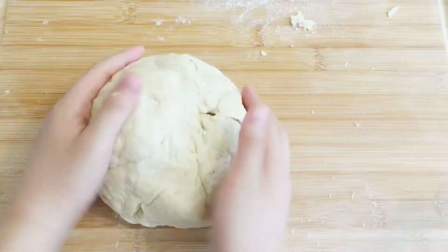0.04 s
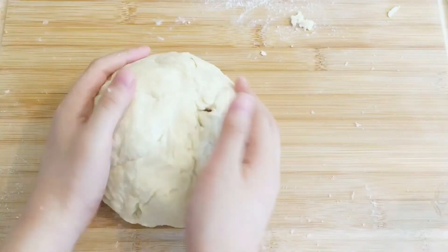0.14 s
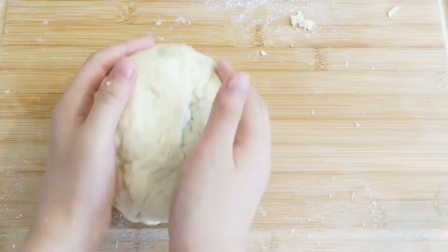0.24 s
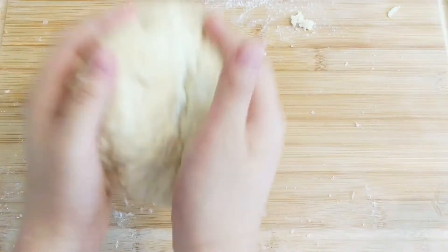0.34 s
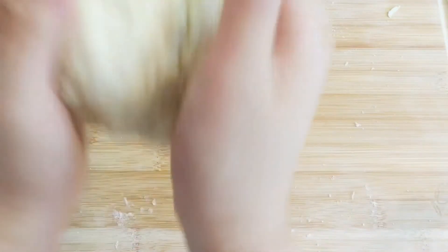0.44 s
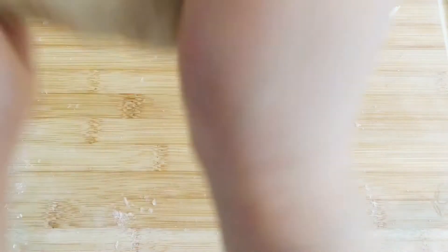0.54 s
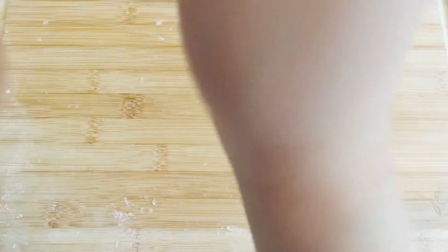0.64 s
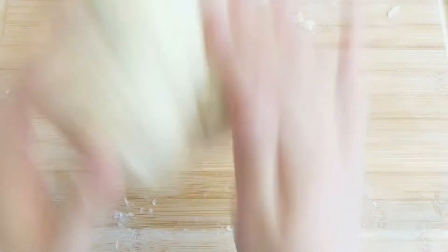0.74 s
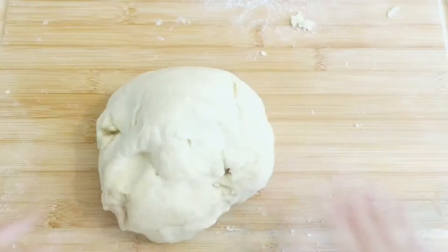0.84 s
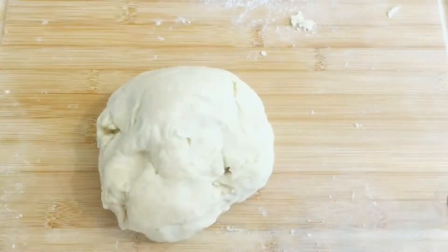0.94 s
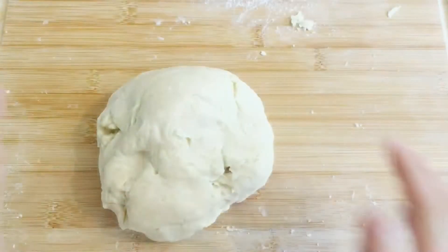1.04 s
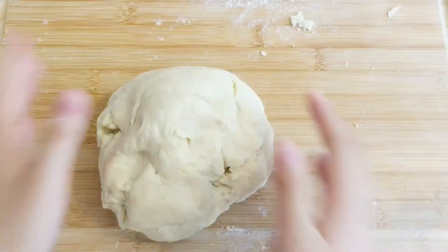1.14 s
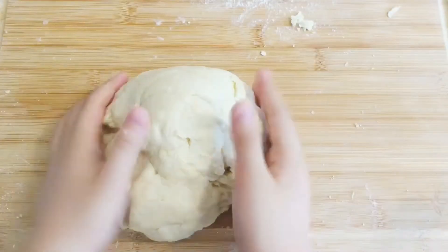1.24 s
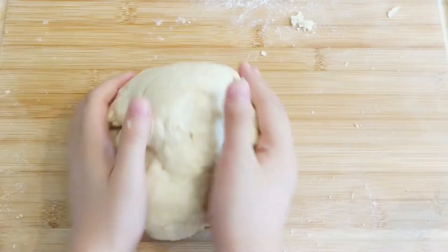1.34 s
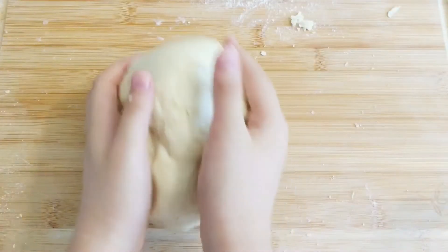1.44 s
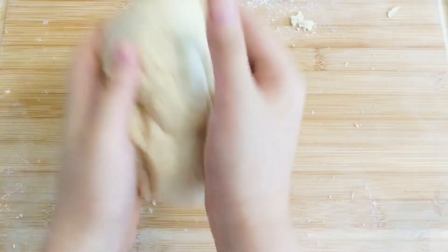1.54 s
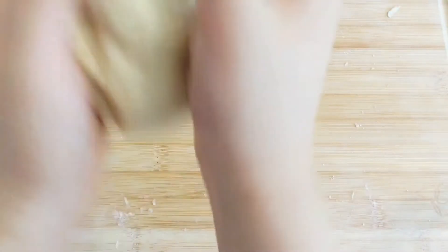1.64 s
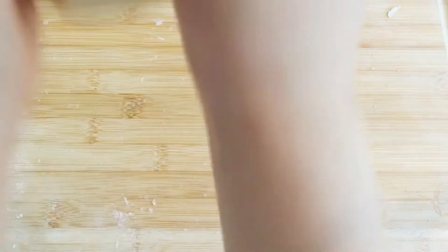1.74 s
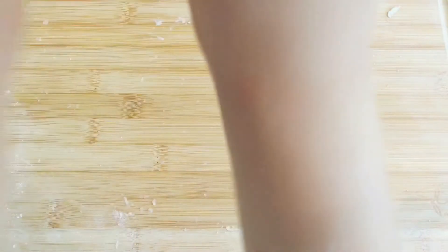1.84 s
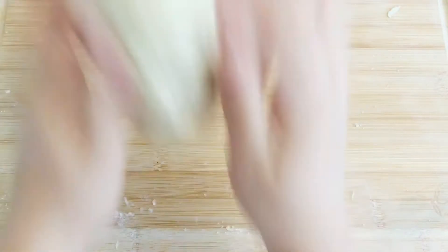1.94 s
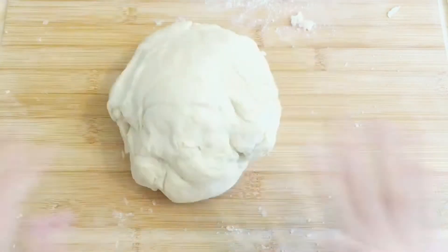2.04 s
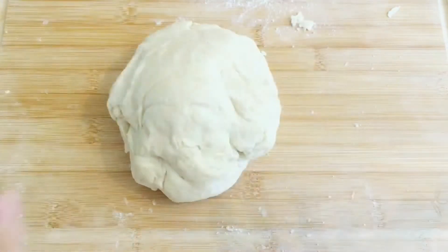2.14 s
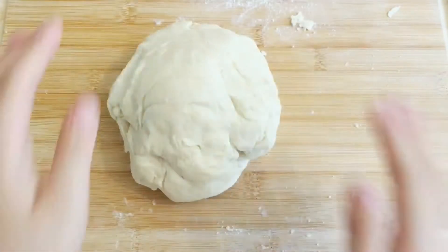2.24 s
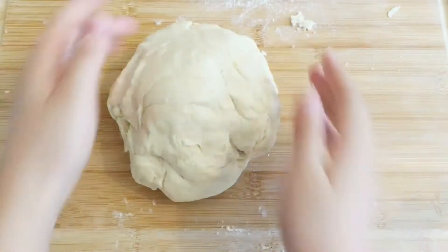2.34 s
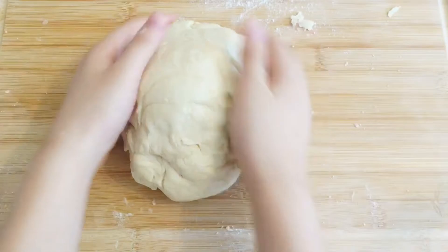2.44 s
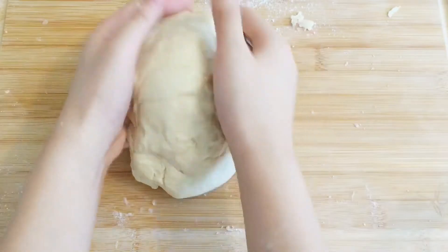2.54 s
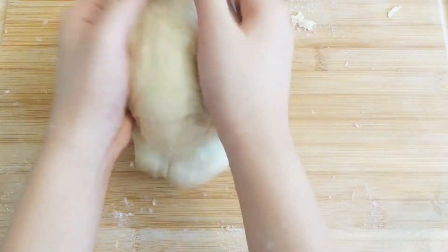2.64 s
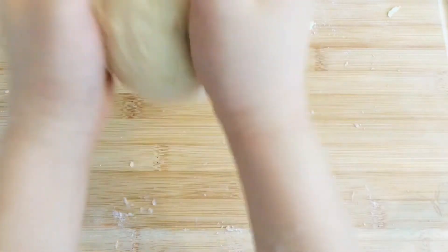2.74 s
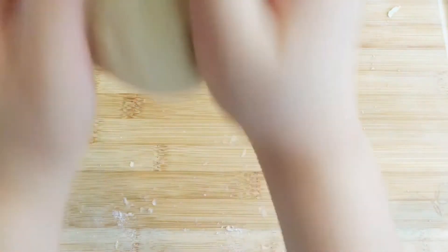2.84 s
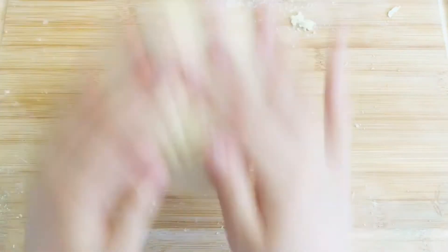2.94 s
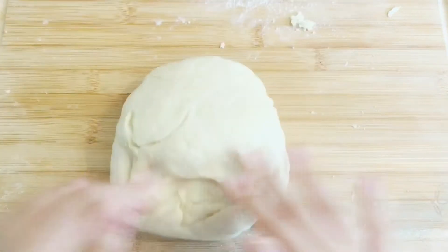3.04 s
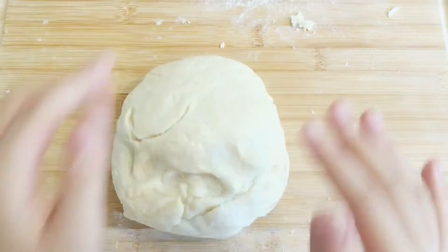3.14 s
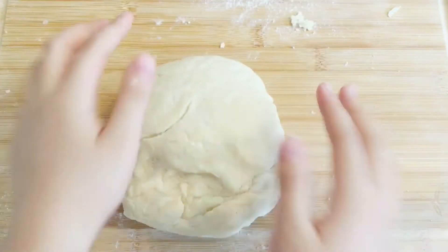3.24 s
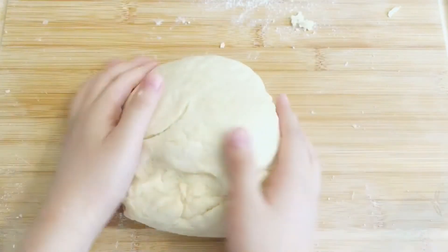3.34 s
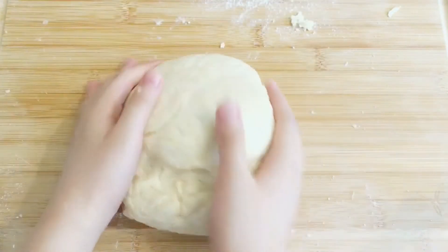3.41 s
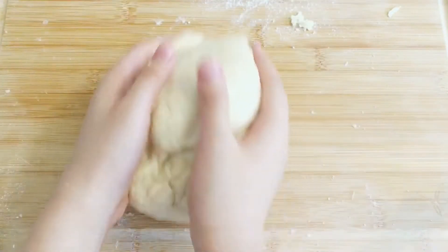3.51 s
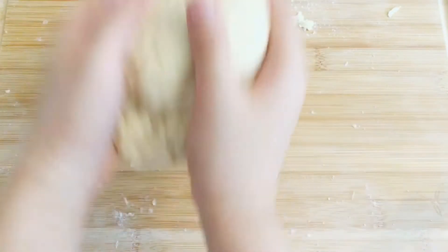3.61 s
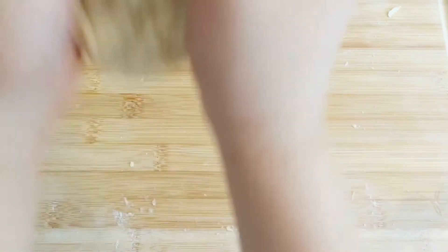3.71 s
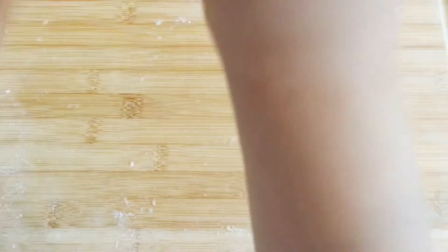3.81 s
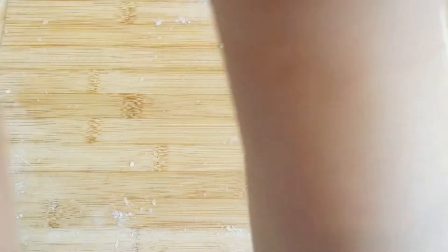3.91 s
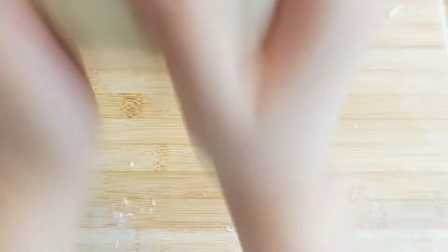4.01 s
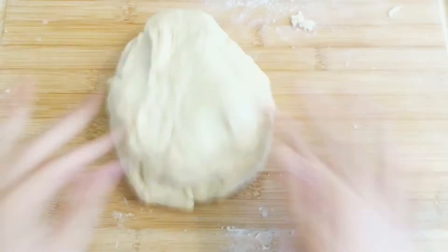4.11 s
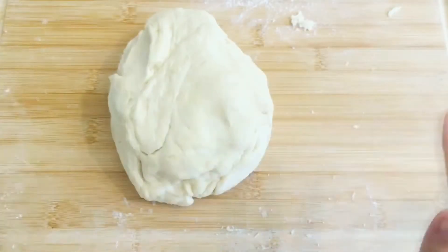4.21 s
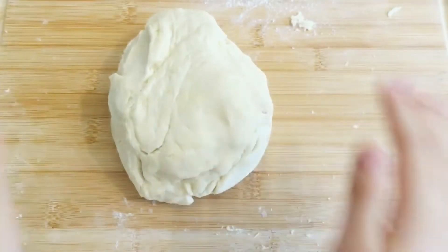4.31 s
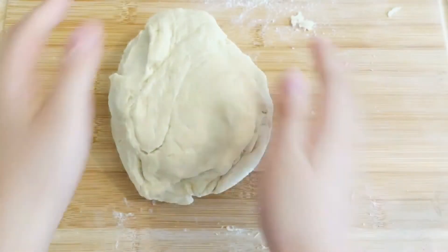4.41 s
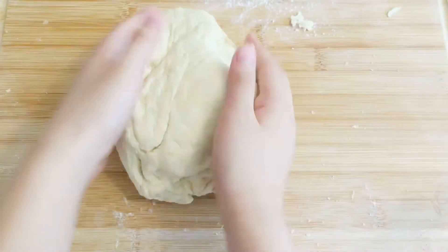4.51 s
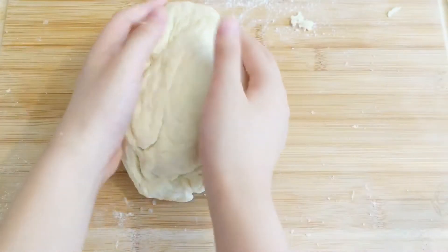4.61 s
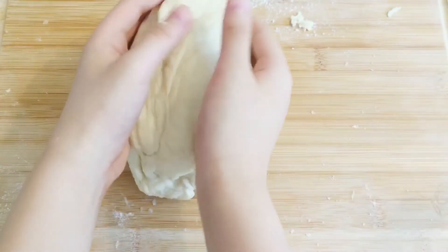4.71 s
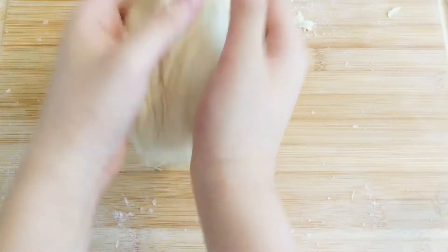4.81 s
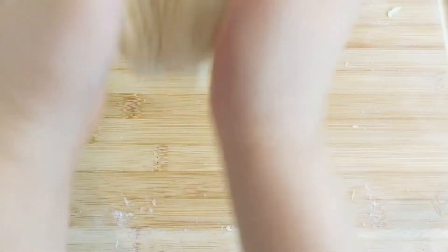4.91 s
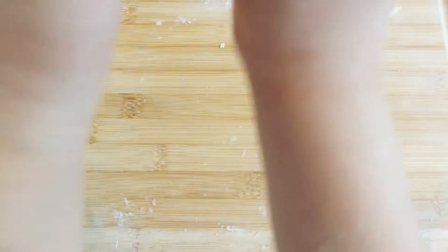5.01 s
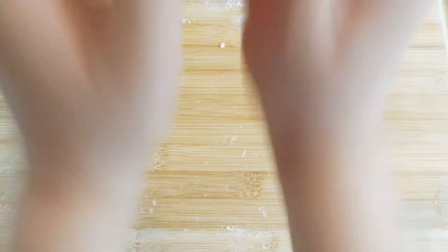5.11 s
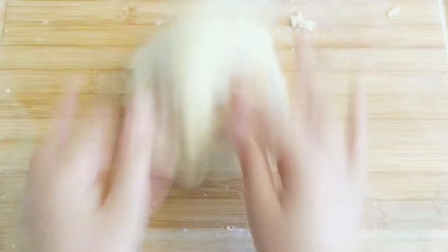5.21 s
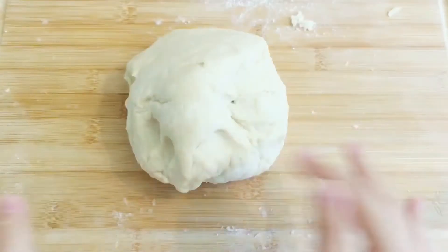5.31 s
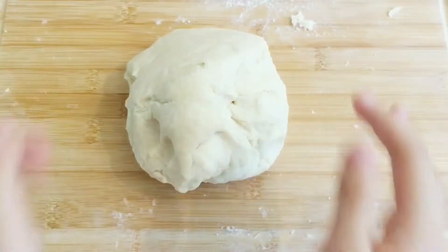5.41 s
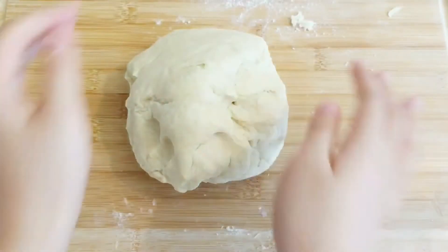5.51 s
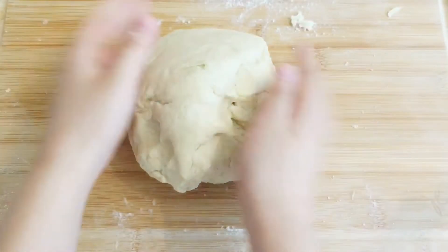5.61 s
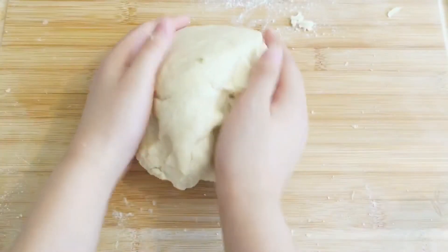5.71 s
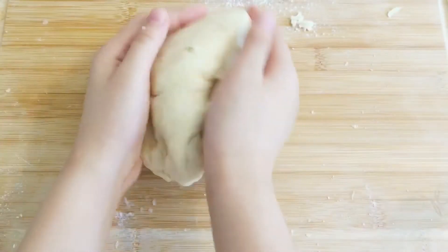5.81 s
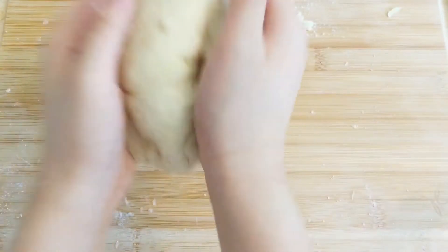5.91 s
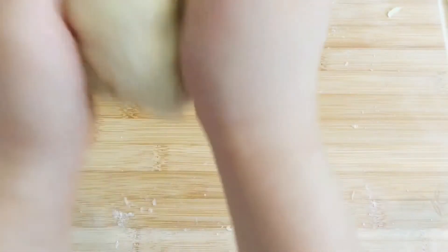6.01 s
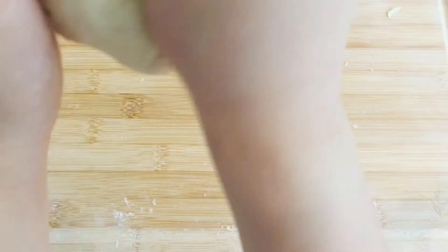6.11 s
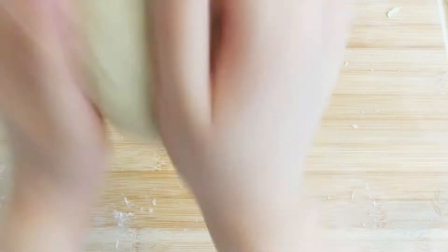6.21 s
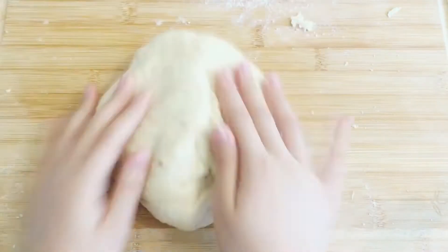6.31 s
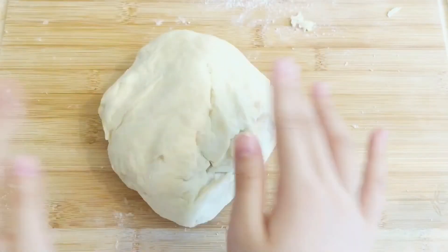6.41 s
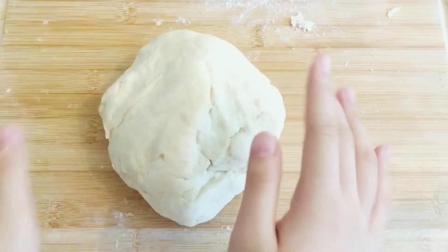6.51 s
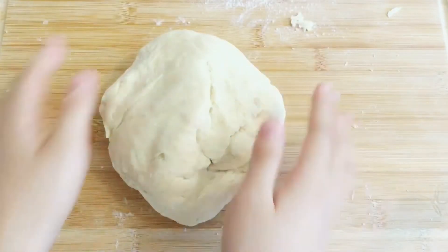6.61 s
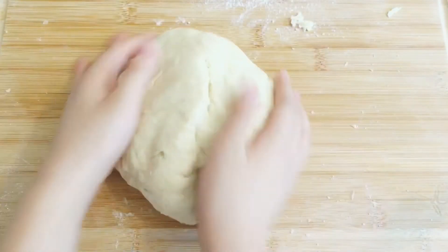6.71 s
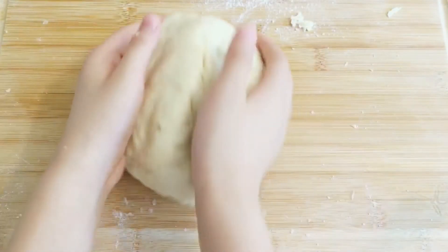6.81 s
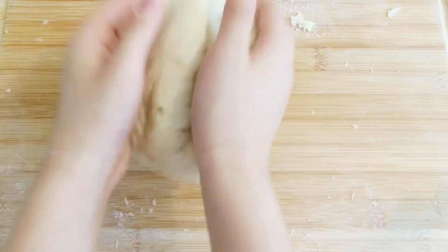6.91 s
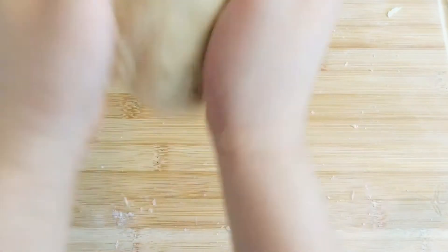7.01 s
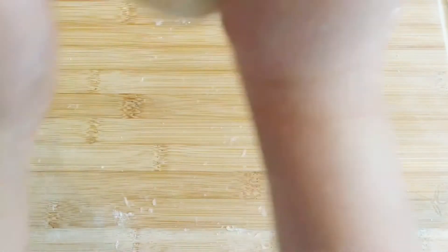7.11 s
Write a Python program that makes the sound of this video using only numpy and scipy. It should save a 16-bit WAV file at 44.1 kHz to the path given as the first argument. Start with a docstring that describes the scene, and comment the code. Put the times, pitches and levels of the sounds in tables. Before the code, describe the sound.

Six loud, meaty dough slaps strike a wooden board roughly every second, each mixing low thud, short wooden knock, bright smack and brief counter boom. Between them come small soft finger pats, sticky ticks, gentle skin-on-flour scraping and a faint slither as the dough leaves the fingers. The microphone is very close; a live kitchen adds brief reflections over low steady hum and rumble, ending as the dough is lifted again.

```python
"""Floury hands work dough in a kitchen, over a steady low hum and a counter rumble; a faint far-off drone
climbs during the first second. The hands pat, cup and rub the dough: resonant puffs of noise, and tiny
stick-slip clicks over a hiss. Six times it is lifted and slapped on a wooden board: dying sines thump and
knock, and trapped air cracks as coloured noise. The room answers with decaying noise, and the hardest slaps
overload the one near microphone."""
import sys
import numpy as np
from scipy import signal
from scipy.fft import rfft, irfft
from scipy.io import wavfile
from scipy.ndimage import uniform_filter1d

SR = 44100
rng = np.random.default_rng(int(sys.argv[2]) if len(sys.argv) > 2 else 0)


def to_wav(sig):
    """Store sig (one row per channel, or 1-D mono) as 16-bit WAV at the path in sys.argv[1].

    Samples outside -1..1 are clipped; the rate is SR.
    """
    pcm = np.clip(np.atleast_2d(sig), -1, 1) * 32767
    pcm = np.round(pcm).astype(np.int16)
    wavfile.write(sys.argv[1], SR, pcm.T)  # frames by channels


N = 315315
T = np.arange(int(0.8 * SR)) / SR  # time axis of one short event [s]


def amp(db):
    """Decibels to gain."""
    return 10 ** (np.asarray(db) / 20)


def evened(x):
    """Scales to rms 1."""
    return x / np.sqrt(np.mean(x ** 2) + 1e-20)


def noise(length):
    """White noise."""
    return rng.standard_normal(length)


def read(points, hz):
    """Joins (frequency [Hz], value) points on a log-frequency axis."""
    point_hz, value = np.transpose(points)
    return np.interp(np.log(hz + 1), np.log(point_hz + 1), value)


def add(mix, start, sound):
    """Mixes a sound in at a start time [s]."""
    part = mix[round(start * SR):][:len(sound)]
    part += sound[:len(part)]


def coloured(x, points):
    """Shapes the spectrum of x by (frequency [Hz], level [dB]) points, at rms 1."""
    gain = amp(read(points, np.fft.rfftfreq(len(x), 1 / SR)))
    return evened(irfft(rfft(x) * gain, len(x)))


def patchy(x, depth_db, size):
    """Lets the colour of x drift in random patches of size (bins, frames), at rms 1."""
    z = signal.stft(x, nperseg=512)[2]
    field = uniform_filter1d(noise(z.shape), size[0], axis=0)
    field = uniform_filter1d(field, size[1], axis=1)
    return evened(signal.istft(z * amp(depth_db * evened(field)), nperseg=512)[1][:len(x)])


def burst(delay, rise):
    """A quick swell, at its peak one rise time [s] after the delay [s], then a fall."""
    u = np.maximum(T - delay, 0) / rise
    return u * np.exp(1 - u)


def gate(t, length, attack, release):
    """Rises, holds until length, then dies away; all times [s]."""
    return np.clip(t / attack, 0, 1) * np.exp(-np.maximum(t - length, 0) / release)


def ring(modes, rise):
    """Dying sines that swell over the contact time [s]; neighbours swing in opposite senses."""
    swing = 0
    for k, (hz, db, t60) in enumerate(modes):
        swing = swing + (-1) ** k * amp(db - 60 * T / t60) * np.sin(2 * np.pi * hz * T)
    return swing * (1 - np.exp(-T / rise))


def puff(hz, width):
    """Noise in one air resonance of a given width [Hz], at rms 1."""
    f = np.fft.rfftfreq(len(T), 1 / SR)
    resonance = 1 / (1 + ((f - hz) / (width / 2)) ** 2)
    return evened(irfft(rfft(noise(len(T))) * resonance, len(T)))


def time_in_air(t):
    """Seconds since the dough was lifted; zero while it lies on the board."""
    lifts = [start + length for start, length, *_ in GRIPS]
    landings = [row[0] for row in SLAPS] + [np.inf]
    return sum((t - up) * ((t > up) & (t < down)) for up, down in zip(lifts, landings))


# colour of the steady kitchen air: (frequency [Hz], relative density [dB per Hz])
AIR_COLOUR = [(20, -27.5), (40, -13.5), (70, -14), (100, -10.5), (130, -9), (190, -14.5), (340, -16.5),
              (430, -20), (650, -27), (950, -27.5), (1500, -31), (2500, -36.5), (6000, -38.5), (16000, -40)]
# colour of the low counter rumble: (frequency [Hz], relative density [dB per Hz])
RUMBLE_COLOUR = [(25, -37.5), (44, -9), (56, 4), (64, -4.5), (78, -19.5), (100, -9.5), (130, -24),
                 (400, -65.5)]
# the faint far-off drone, climbing in pitch: (time [s], pitch [Hz], peak level [dB])
FAR_DRONE = [(0.098, 300, -77.5), (0.399, 343.7, -61), (0.62, 370, -68), (.8, 405, -63.5),
             (1.098, 410, -70.5)]


def background(air_db=-59.5, hum_hz=56.9, hum_db=-64, rest_db=-56, sink_db_per_s=29.5):
    """Steady air, a low hum, a far drone, and a counter rumble that sinks while the dough is in the air."""
    t = np.arange(N) / SR
    rumble_db = rest_db - sink_db_per_s * uniform_filter1d(time_in_air(t), size=400)
    rumble = amp(rumble_db) * coloured(noise(N), RUMBLE_COLOUR)
    hum = amp(hum_db) * np.sin(2 * np.pi * (hum_hz * t + rng.random()))
    time, pitch, level = np.transpose(FAR_DRONE)
    far_phase = 2 * np.pi * np.cumsum(np.interp(t, time, pitch)) / SR
    far = amp(np.interp(t, time, level)) * np.sin(far_phase) * (t < time[-1])
    air_bed = amp(air_db) * patchy(coloured(noise(N), AIR_COLOUR), depth_db=-0.1, size=(4, 30))
    return rumble + hum + far + air_bed


def friction(pressure, colour, grains_per_s, spread_db, smooth, scuff_db):
    """Skin sticks and slips on flour: tiny uneven clicks over a hiss whose colour drifts in patches."""
    sizes = amp(spread_db * np.minimum(rng.exponential(1, N), 4))
    grains = evened(sizes * rng.choice([-1, 1], N) * (rng.random(N) < grains_per_s / SR))
    scrape = patchy(coloured(grains + smooth * noise(N), colour), depth_db=3.5, size=(8, 12))
    scuffs = evened(uniform_filter1d(uniform_filter1d(noise(N), size=900), size=400))
    return pressure * amp(scuff_db * scuffs) * scrape


# hands close on the dough, settle, tighten and lift it:
# (time [s], time until lift-off [s], relative landing level [dB], settling time [s], relative lifting level [dB])
GRIPS = [(0.091, 0.29, -51.5, 0.057, -53), (1.284, 0.3, -52, 0.15, -51), (2.470, 0.25, -46.5, 0.089, -50.5),
         (3.377, 0.245, -48.5, 0.17, -53), (4.549, 0.305, -53, 0.071, -51),
         (5.692, 0.23, -51.5, 0.082, -48.5), (6.724, 0.25, -49.5, 0.16, -52.5)]


def grip_pressure(hold_db=-62.5, tighten_s=0.079):
    """Strong as the hands land, fading as they settle, growing again until the dough leaves the board."""
    out = np.zeros(N)
    for start, length, landing_db, settle, lift_db in GRIPS:
        landing = amp(landing_db) * np.exp(-(T / settle) ** 2)
        lifting = amp(lift_db) * np.exp(np.minimum(T - length, 0) / tighten_s)
        pressure = np.sqrt(landing ** 2 + amp(hold_db) ** 2 + lifting ** 2)
        add(out, start, pressure * gate(T, length, attack=0.0055, release=0.007))
    return out


# colour of palms rubbing dough: (frequency [Hz], relative density [dB per Hz])
RUB_COLOUR = [(150, -25), (250, -1), (586, -12.5), (845, -1.5), (1010, -8), (1260, -4.5), (1610, -8.5),
              (2160, -6.5), (2860, -11.5), (4120, -11.5), (4990, -17), (5440, -14), (13400, -18),
              (16000, -20)]


def rubbing():
    """Stick-slip of gripping hands, driven by their pressure."""
    return amp(0.5) * friction(grip_pressure(), RUB_COLOUR, grains_per_s=900, spread_db=0.9,
                               smooth=1.4, scuff_db=1.5)


# finger pats and small sticky pops:
# (time [s], relative level [dB], pitch [Hz], click weight against the body [dB])
PATS = [(0.092, -36, 832, -20), (.374, -39, 897, -10.5), (0.598, -59, 1480, 11), (1.291, -32, 1070, -20),
        (1.587, -39.5, 934, -22.5), (1.913, -52.5, 2214, 16), (2.017, -55, 1765, 18.5),
        (2.472, -34.5, 1117, -3), (2.4909, -17, 1068, -4.5), (3.381, -35.5, 960, -17),
        (3.620, -36.5, 1138, -1.5), (4.282, -25.5, 590, -14), (4.553, -50, 1360, -6),
        (4.588, -44.5, 855, -6.5), (4.777, -61, 1514, 5.5), (4.847, -35, 1010, -13.5),
        (5.175, -49, 1525, 15), (5.259, -35.5, 1038, -5.5), (5.931, -32, 943, -16),
        (6.143, -66, 1500, 18.5), (6.777, -35, 2110, 5), (6.972, -39, 910, -15.5)]


def finger_pats():
    """A short resonant puff of air with a drier, brighter click on top."""
    out = np.zeros(N)
    for start, db, hz, click_db in PATS:
        body = puff(hz, width=500) * burst(0, rise=0.0014)
        click = amp(click_db) * coloured(noise(len(T)), SLIDE_COLOUR) * burst(0, rise=0.00053)
        add(out, start, amp(db - 8.5) * (body + click))
    return out


# how long the kitchen's late tail lasts: (frequency [Hz], t60 [s])
ROOM_T60 = [(100, 0.18), (300, 0.37), (600, 0.76), (1100, 0.68), (3500, 0.8), (7000, 0.88), (11000, 0.66),
            (16000, 0.79)]
# what the walls throw back: (frequency [Hz], level [dB])
WALL_COLOUR = [(60, -7.5), (200, -0.5), (330, -2), (600, -0.5), (1000, -3.5), (2000, 0), (4000, -2),
               (8000, -5), (16000, -1.5)]


def fade_in_room(sound, early_db=-42, early_t60=0.19, late_db=-46):
    """Hard walls: a quick cluster of near reflections and a longer tail, each band dying at its own speed."""
    hz, t, z = signal.stft(sound, SR, nperseg=256)
    late = amp(late_db - 60 * t / read(ROOM_T60, hz)[:, None])
    early = amp(early_db - 60 * t / early_t60)
    walls = amp(read(WALL_COLOUR, hz))[:, None]
    tail = signal.istft(z * (late + early) * walls, SR, nperseg=256)[1][:len(T)]
    return tail * np.clip((T - 0.003) / 0.003, 0, 1)  # the first return comes after 3 ms


def kitchen(x):
    """What the room gives back; two echo patterns trade places as hands and body move."""
    turn = np.pi * np.arange(N) / SR / 2.3  # half a circle in 2.3 s
    out = np.zeros(N)
    for share in (np.cos(turn), np.sin(turn)):
        out += signal.oaconvolve(x * share, fade_in_room(noise(len(T))))[:N]
    return out


# dough sliding through the fingers in the air: (time [s], length [s], relative level [dB], rise time [s])
RELEASES = [(0.66, 0.21, -57.5, 0.08), (1.898, 0.08, -56.5, 0.01), (2.022, 0.043, -50.5, 0.015),
            (2.836, 0.19, -56.5, 0.09), (4.036, 0.14, -52.5, 0.031), (5.094, 0.29, -62.5, 0.05),
            (6.128, 0.26, -62.5, 0.13)]


def slide_pressure():
    """The fingers loosen and the dough slips through them."""
    out = np.zeros(N)
    for start, length, db, rise in RELEASES:
        add(out, start, amp(db) * gate(T, length, attack=rise, release=0.02))
    return out


# colour of dough slipping over skin, also of the pat clicks: (frequency [Hz], relative density [dB per Hz])
SLIDE_COLOUR = [(300, -21.5), (1200, -4), (3000, -5.5), (7000, -2), (10000, -1), (16000, -4)]


def sliding():
    """Stick-slip of dough leaving the fingers, brighter than the rubbing."""
    return amp(-0.5) * friction(slide_pressure(), SLIDE_COLOUR, grains_per_s=870, spread_db=3.0,
                                smooth=1.5, scuff_db=2.3)


# one row a slap, levels relative within each layer: (time [s], thump level [dB], thump pitch [Hz],
# wood knock level [dB], hollow level [dB], hollow pitch [Hz], counter boom level [dB], crack level [dB],
# crack delay [s], treble tilt [dB], then two air pockets, each as pitch [Hz], peak height [dB])
SLAPS = [(0.8505, -5, 314.5, -1, -8.5, 910, 1, -9, 0.0015, 1, 4560, 7, 6130, 5),
         (2.0531, -11.5, 324, -7.5, -8, 867, -0.5, -13.5, 0.00027, -1, 2455, 9.5, 6430, 3),
         (3.0403, -2, 322.7, -1, -1, 994, -0.5, -7, 0.0017, -3.5, 3670, 10, 7700, 6.5),
         (4.1535, -11, 320, -7, -11.5, 868, 2.5, -11.5, 0.00071, -5, 2080, 4.5, 5620, 3),
         (5.2809, -8.5, 334, -7, -2, 896, -2.5, -6, 0.0028, -7, 8450, 8, 5970, 3),
         (6.3460, -25, 337, -10, -10.5, 1273, -3.5, -10.5, 0.0031, 3, 6900, 7.5, 2440, 4)]
# modes of the board, retuned a little at each slap: (nominal pitch [Hz], relative level [dB], t60 [s])
BOARD = [(382, -4.5, 0.036), (510, -7.5, 0.03), (706.2, -8, 0.025), (852, -8, 0.039), (1100, -15, .025),
         (1337, -8.5, 0.036), (2120, -13.5, 0.033), (2440, -15, 0.031)]
# modes of the counter under the board: (pitch [Hz], relative level [dB], t60 [s])
COUNTER = [(59, -31, 0.47), (172, -20, 0.035), (213.3, -27, 0.31), (239, -24, 0.1)]
# low rumble of counter and room: (frequency [Hz], relative density [dB per Hz])
BOOM_COLOUR = [(25, -38), (45, -6), (60, -3), (80, -2.5), (110, -10.5), (135, -12.5), (200, -19.5),
               (400, -47), (1000, -81.5)]


def slaps(lag=0.4, rumble_db=-36, rumble_t60=0.77):
    """The dough's mass lands a moment after first touch; the board knocks and shakes the counter."""
    out = np.zeros(N)
    for start, thump_db, thump_hz, knock_db, hollow_db, hollow_hz, boom_db, _, delay, *_ in SLAPS:
        thump = amp(thump_db) * ring([(thump_hz, 5, 0.04)], rise=0.0036)
        board = [(hz * rng.uniform(0.94, 1.02), db, t60) for hz, db, t60 in BOARD]
        wood = amp(knock_db) * ring(board, rise=0.0041)
        hollow = amp(hollow_db) * ring([(hollow_hz, 3, 0.022)], rise=0.00038)
        rumble = amp(rumble_db - 60 * T / rumble_t60) * coloured(noise(len(T)), BOOM_COLOUR)
        rumble *= np.minimum(T / 0.0027, 1)
        counter = amp(boom_db) * (ring(COUNTER, rise=0.0011) + rumble)
        # the mass lands at a fraction (lag) of the crack delay
        add(out, start + lag * delay, thump + wood + hollow + counter)
    return out


# colour of escaping air before its pockets: (frequency [Hz], relative density [dB per Hz])
CRACK_COLOUR = [(100, -19.5), (600, -0.5), (1300, 3), (2300, 0), (3000, -5), (4000, -1.5), (4900, -11),
                (6200, -5), (7200, -12), (9200, -7), (12000, -9.5), (16000, -21.5)]


def air(treble_db, pockets, pocket_octaves=0.24):
    """Rush of air from under the dough, coloured by the pockets that it leaves."""
    f = np.geomspace(80, 17000, 160)
    peaks = 0
    for hz, db in np.reshape(pockets, (-1, 2)):
        peaks = peaks + db * np.exp(-(np.log2(f / hz) / pocket_octaves) ** 2)
    tilt = treble_db * f / (f + 5000)
    return coloured(noise(len(T)), np.c_[f, read(CRACK_COLOUR, f) + peaks + tilt])


# colour of damp dough spreading on wood: (frequency [Hz], relative density [dB per Hz])
SMACK_COLOUR = [(150, -17.5), (400, -2), (600, -6), (850, 1), (1300, 3.5), (1550, -13), (2100, -9.5),
                (3000, -17.5), (8000, -34)]


def cracks(scatter_db, smack_db=-7, spread_octaves=0.37, pocket_share=0.75):
    """Dough smacks and trapped air bursts out, spraying to all sides; the walls return a diffuse wash."""
    out = np.zeros(N)
    for row in SLAPS:
        start, (crack_db, delay, treble_db, *pockets) = row[0], row[7:]
        crack = amp(crack_db) * (burst(delay, rise=0.00064) + 0.39 * burst(0, rise=0.0016))
        smack = amp(crack_db + smack_db) * burst(0, rise=0.0023)
        direct = crack * air(treble_db, pockets) + smack * coloured(noise(len(T)), SMACK_COLOUR)
        # in the wash the pockets are broader and flatter; the norms carry over each burst's energy
        blurred = np.reshape(pockets, (-1, 2)) * [1, pocket_share]
        wash = np.linalg.norm(crack) * air(treble_db, blurred, spread_octaves)
        wash = wash + np.linalg.norm(smack) * coloured(noise(len(T)), SMACK_COLOUR)
        wash = wash.std() * patchy(wash, depth_db=2.2, size=(2, 40))
        add(out, start, direct + amp(scatter_db) * fade_in_room(wash))
    return out


# dough settling and palms landing, soft and low: (time [s], relative level [dB], pitch [Hz])
FLOPS = [(1.289, -43.5, 222), (3.385, -39, 232), (3.401, -45, 204), (4.282, -31.5, 221.4),
         (4.305, -30, 163), (4.337, -32.5, 206), (5.713, -46.5, 219), (6.743, -41, 198)]


def dough_flops():
    """A soft low ring of the dough with the board answering under it."""
    out = np.zeros(N)
    for start, db, hz in FLOPS:
        body = ring([(hz, 2, 0.13)], rise=0.0022)
        wood = amp(-6.0) * ring(BOARD, rise=0.0027)
        add(out, start, amp(db) * (body + wood))
    return out


# small dull ticks: (time [s], relative level [dB], low pitch [Hz], high pitch [Hz])
TICKS = [(2.7006, -38, 1423, 3633), (5.0199, -44, 1627, 3460)]


def dull_ticks():
    """Two narrow noise resonances in one short burst."""
    out = np.zeros(N)
    for start, db, low_hz, high_hz in TICKS:
        body = puff(low_hz, width=220) + amp(-1.5) * puff(high_hz, width=400)
        add(out, start, amp(db - 7.5) * body * burst(0, rise=0.0018))
    return out


def scene():
    """Dough, hands and room at one near microphone."""
    near = rubbing() + finger_pats() + sliding() + slaps() + dough_flops() + dull_ticks()
    # the cracks bring their own wash from the walls
    return (background() + near + kitchen(near) + cracks(scatter_db=0.5))[None]


def record(dry, edge_hz=16100):
    """The hardest slaps overload the microphone, which rounds their peaks; then the band limit."""
    clipped = dry / (1 + dry ** 8) ** (1 / 8)
    lowpass = signal.firwin(301, edge_hz, window=("kaiser", 8), fs=SR)
    return signal.oaconvolve(clipped, lowpass[None], "same")


dry = scene()
out = record(dry)
to_wav(out)
```